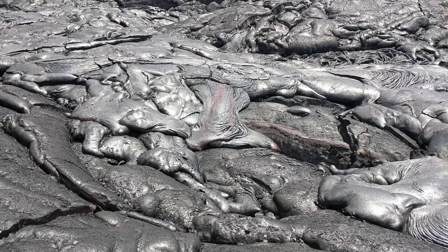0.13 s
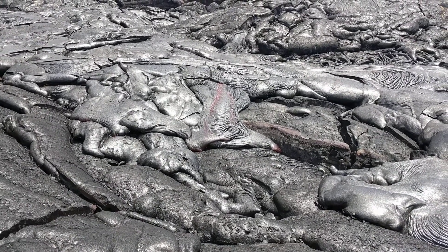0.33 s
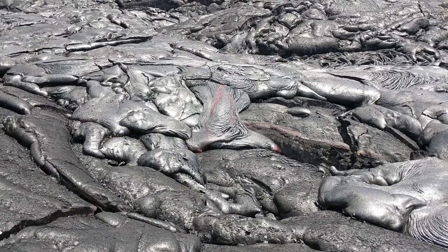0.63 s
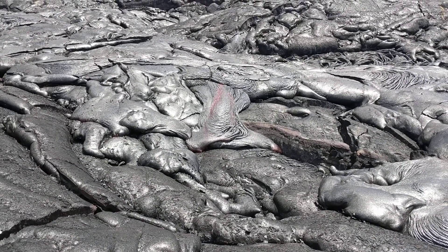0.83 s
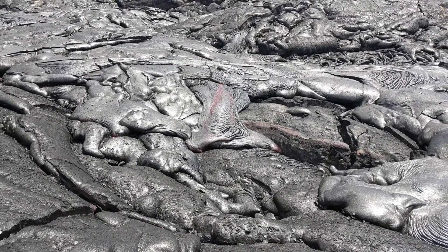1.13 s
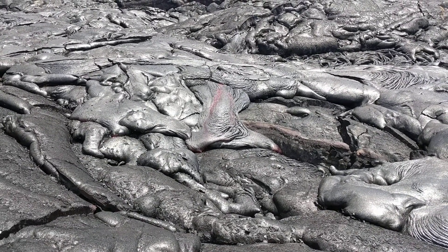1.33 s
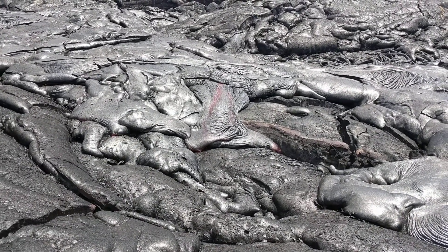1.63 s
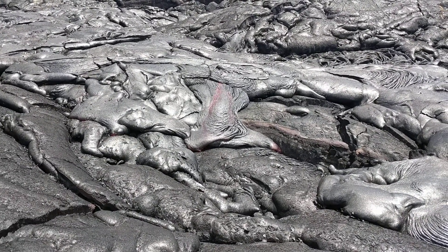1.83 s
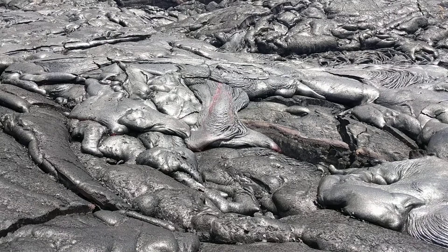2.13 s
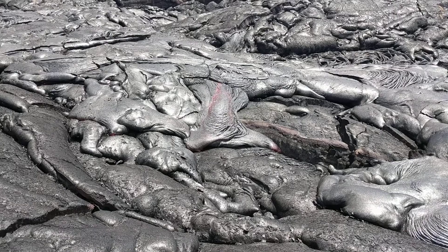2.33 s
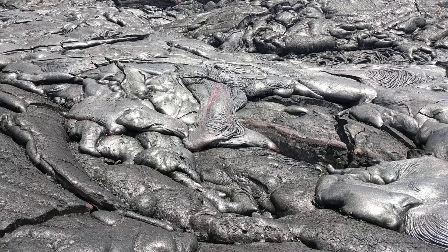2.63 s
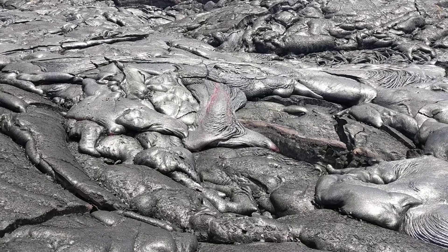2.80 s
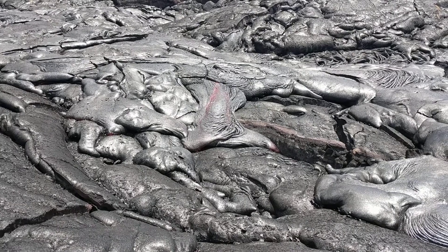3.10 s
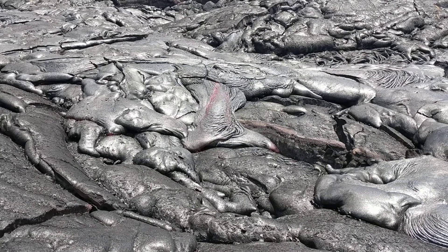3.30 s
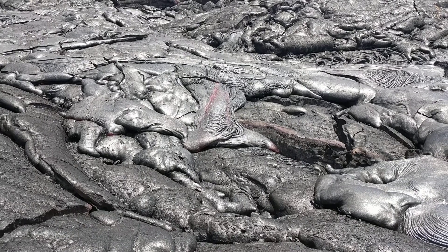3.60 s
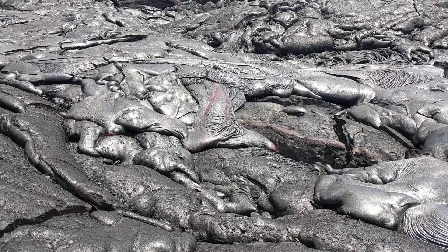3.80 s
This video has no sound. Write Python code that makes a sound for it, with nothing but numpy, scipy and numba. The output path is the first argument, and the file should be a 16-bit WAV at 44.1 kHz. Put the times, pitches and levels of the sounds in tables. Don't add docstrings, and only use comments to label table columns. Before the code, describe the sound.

Sparse sharp cracks over a fine patter of tiny ticks from shrinking lava crust, outdoors without echo. Low wind buffets hit the bare microphone early and again past the middle, above faint hiss.

```python
import sys
import numpy as np
from scipy import signal
from scipy.fft import rfft, irfft
from scipy.io import wavfile
from scipy.ndimage import uniform_filter1d
from numba import njit

SR = 44100
rng = np.random.default_rng(int(sys.argv[2]) if len(sys.argv) > 2 else 0)


def store_wav(level_fs):
    pcm = np.round(np.clip(np.atleast_2d(level_fs), -1, 1) * 32767)
    wavfile.write(sys.argv[1], SR, pcm.T.astype(np.int16))


def volts_from_decibels(level):
    exponent = np.asarray(level, float) / 20
    return 10 ** exponent


N = 174195


def level(x, db):
    return x * volts_from_decibels(db) / np.sqrt(np.mean(x ** 2))


@njit
def svf(x, hz, share):
    y, band, low = np.empty(len(x)), 0., 0.
    for i in range(len(x)):
        g = np.tan(np.pi * hz[i] / SR)
        v = (band + g * (x[i] - low)) / (1 + g * (g + share))
        band = 2 * v - band
        low = low + 2 * g * v
        y[i] = share * v
    return y


def resonate(x, hz, share):
    return svf(x, np.full(len(x), float(hz)), share)


def walk(rate):
    hold = int(SR / rate)
    steps = np.repeat(rng.standard_normal(N // hold + 1), hold)
    w = uniform_filter1d(uniform_filter1d(steps, hold), hold)[:N]
    return w / w.std()


def colour(x, table):
    hz, db = np.array(table).T
    f = np.fft.rfftfreq(len(x), 1 / SR) + 1
    return irfft(rfft(x) * volts_from_decibels(np.interp(np.log(f), np.log(hz), db)), len(x))


def add(out, at_s, x):
    i = max(int(at_s * SR), 0)
    out[i:i + len(x)] += x[:len(out) - i]


# frequency [Hz], relative level [dB].
FLOOR_TONE = [(150, -22), (340, 12), (1400, -3.5), (2600, -10), (7000, -16), (13000, -51), (15800, -30),
              (16200, -39)]


def hiss():
    whine_hz, whine_width_hz = 8920, 100
    whine = resonate(rng.standard_normal(N), whine_hz, whine_width_hz / whine_hz)
    air = level(colour(rng.standard_normal(N), FLOOR_TONE), -61)
    return air * volts_from_decibels(0.09 * walk(31.05)) + level(whine, -74)


def eddy(hz, share, air):
    steady_s, steadiness = .08, .4
    centre = hz * np.exp(0.053 * walk(11))
    x = svf(svf(air, centre, share), centre, share)
    x = svf(x, centre, 0.79 * share)
    power = uniform_filter1d(x ** 2, int(steady_s * SR)) + 1e-12
    return level(x / power ** steadiness, 0)


# time in seconds [s], rumble level [dB], share of fast eddies [dB].
GUST_FLOW = [(0, -24, -5), (.15, -26, -3.5), (0.331, -18.5, 0.5), (.43, -25.5, -1), (.59, -20, -1),
             (.76, -24, -2.5), (1.0, -24, -13), (1.07, -29.5, -1.5), (1.42, -24, -8.5), (1.56, -33.5, -7),
             (1.83, -32, -9.5), (2.15, -36, -7.5), (2.5, -31, -6), (2.64, -22.5, -5.5),
             (2.948, -23.5, -8.5), (3.05, -38.5, -17), (3.188, -26.5, -5.5), (3.95, -32.5, -9)]

# pitch [Hz], level [dB], how strongly it follows the fast share [dB per dB],
# flutter [dB].
EDDY_SIZES = [(58.77, -7, -0.8, 2.5), (86.66, -0.5, 0.48, 2), (131.5, -10, 0.81, 3), (263, -27.5, 1.53, 3),
              (422, -29.5, 1.1, 3.5), (800, -38.5, 0.71, 3.5)]


def wind():
    t = np.arange(N) / SR
    air = rng.standard_normal(N)
    s, rumble_db, fast_db = np.array(GUST_FLOW).T
    flow_db = np.interp(t, s, rumble_db) + 0.67 * walk(15)
    fast_db = np.interp(t, s, fast_db)
    out = np.zeros(N)
    for hz, own_db, follow, flutter_db in EDDY_SIZES:
        eddy_db = flow_db + own_db + follow * fast_db + flutter_db * walk(21.934)
        out += eddy(hz, .68, air) * volts_from_decibels(eddy_db)
    return out


# centre in seconds [s], swell level [dB], length [s],
# sharp rasp level [dB].
BUFFET_HITS = [(0.216, -25, 0.015, -61), (0.305, -23.5, 0.007, -36.5), (0.321, -31, 0.0099, -45.5),
               (0.353, -17, 0.0058, -30), (0.367, -17.5, 0.013, -33), (0.472, -26, 0.01, -52),
               (0.552, -30.5, 0.01, -57.5), (0.587, -27.5, 0.017, -50.5), (0.625, -33, 0.0092, -47),
               (0.645, -21.5, 0.004, -31), (1.239, -33, 0.009, -64), (1.52, -34, 0.005, -52),
               (2.622, -20, 0.0066, -33.5), (2.658, -33.5, 0.0064, -77), (2.738, -29, 0.0023, -46),
               (2.775, -37, 0.0072, -67), (2.86, -26, 0.021, -62), (2.897, -40, 0.0044, -72),
               (3.135, -46, 0.019, -67), (3.178, -38, 0.0033, -44), (3.213, -33.5, 0.0057, -60),
               (3.303, -35, 0.0083, -58.5), (3.903, -46.5, 0.12, -61)]


def buffets():
    rise = 0.44
    swell_hz, rasp_hz, swell_rough_db, rasp_rough_db = 185, 626, 4, 5
    t, swell, rasp = np.arange(N) / SR, np.zeros(N), np.zeros(N)
    for s, swell_db, length_s, rasp_db in BUFFET_HITS:
        age = (t - s) / max(length_s, .002)
        shape = np.exp(np.where(age < 0, age / rise, -age))
        swell += shape * volts_from_decibels(swell_db)
        rasp += shape * volts_from_decibels(rasp_db)
    air = rng.standard_normal(N)
    swell = swell * volts_from_decibels(swell_rough_db * walk(100)) * eddy(swell_hz, 1.287, air)
    rasp = rasp * volts_from_decibels(rasp_rough_db * walk(250)) * eddy(rasp_hz, 0.82, air)
    return swell + rasp


# time in seconds [s], signed pressure [full scale],
# half width [s].
VORTICES = [(0.137, -0.15, 0.0015), (0.293, -0.15, 0.0034), (0.355, 0.051, 0.00075), (.479, -0.28, 0.0017),
            (0.54, 0.083, 0.0045), (0.602, 0.031, 0.0034), (.630, -.12, 0.0017), (0.6478, 0.14, 0.00092),
            (1.236, .1, 0.0017), (1.519, 0.026, 0.0048), (1.5222, -0.098, 0.0014), (2.6225, -0.26, 0.0007),
            (2.646, -0.18, 0.0023), (2.7375, -0.27, 0.0011), (2.806, 0.11, 0.0011), (2.8573, 0.099, 0.0017),
            (3.126, -0.11, 0.0015), (3.1774, -0.19, 0.0014), (3.2108, -0.12, 0.0023),
            (3.3103, -0.049, 0.0026), (3.495, -0.073, 0.0018), (3.9071, -0.14, 0.0028)]


def thumps():
    t, push = np.arange(N) / SR, np.zeros(N)
    for s, pressure, half_s in VORTICES:
        push += pressure / np.cosh(np.clip(1.5 * (t - s) / half_s, -50, 50))
    return 0.52 * push + 1.94 * resonate(push, 100, 0.75)


def snap(noise, hz, share):
    snap_s, ring_s, ring_db, spiky_db, strike = 0.0005, 0.0035, -18, -2.5, 6.5
    t = np.arange(noise.shape[1]) / SR
    shape = np.exp(-t / snap_s) + volts_from_decibels(ring_db) * np.exp(-t / ring_s)
    burst = noise[0] * volts_from_decibels(spiky_db * noise[1]) * shape
    burst = burst + strike * (t == 0)
    hz = min(hz, .42 * SR)
    x = resonate(resonate(burst, hz, share), hz, share)
    return x / np.sqrt(np.sum(x ** 2) / (.003 * SR))


# time in seconds [s], level [dB].
TICK_PATTER = [(0, -54.5), (.35, -57.5), (.6, -54), (1.1, -55), (1.8, -57.5), (2.4, -55.5), (3.15, -60),
               (3.6, -48), (3.95, -56.5)]


def ticks():
    ticks_per_s, low_hz, octaves, dull_db_per_octave = 440, 1670, 3.41, 1.5
    spread_db, swarm_db, flicker_db = 2, 2, 4
    out, count = np.zeros(N), int(ticks_per_s * N / SR)
    busy_db = np.interp(np.arange(N) / SR, *np.array(TICK_PATTER).T) + swarm_db * walk(35)
    draws, noises = rng.random((count, 3)), rng.standard_normal((count, 2, 160))
    for (when, pitch, size), noise in zip(draws, noises):
        octave = octaves * pitch ** .5
        size_db = np.minimum(-spread_db * np.log(size), 9)
        dull_db = dull_db_per_octave * (octaves - octave)
        db = busy_db[int(when * N)] - 13.0 + size_db - dull_db
        add(out, when * N / SR, volts_from_decibels(db) * snap(noise, low_hz * 2 ** octave, .33))
    sizzle = level(resonate(rng.standard_normal(N), 14240, 0.81), -11)
    return out + sizzle * volts_from_decibels(busy_db + flicker_db * walk(220))


# time in seconds [s], body level [dB], bright edge level [dB], body pitch [Hz],
# low knock level [dB].
BIG_CRACKS = [(0.123, -45, -40.5, 5100, -61), (0.1745, -51, -58, 4250, -53.5),
              (0.2618, -57, -47, 4170, -79), (0.5752, -58, -43, 4700, -63), (0.5823, -61, -45, 5400, -67),
              (0.589, -69, -37.5, 5900, -58), (0.8379, -70, -46, 5600, -62),
              (0.8736, -36.5, -60, 4840, -59), (1.1045, -49, -44, 5030, -58.5),
              (1.197, -45, -39.5, 5960, -51.5), (1.3548, -48, -45, 5940, -65),
              (1.5357, -43.5, -57, 4330, -60), (1.668, -64, -46, 5700, -61),
              (2.1882, -44.5, -60, 4260, -46), (2.1888, -32.5, -70, 5260, -66),
              (2.3014, -50, -52, 4460, -58.5), (2.333, -44, -49, 7200, -73), (2.3541, -64, -49, 4500, -81),
              (2.4835, -40.5, -53, 3900, -68), (2.6205, -32.5, -31, 4440, -67),
              (2.8428, -51.5, -41.5, 5000, -75), (3.0595, -45.5, -42, 5740, -65),
              (3.2257, -43, -38, 6650, -57), (3.6006, -49, -49, 5500, -64),
              (3.6467, -79, -43.5, 3800, -53.5)]

# time in seconds [s], body level [dB], bright edge level [dB], body pitch [Hz].
SMALL_FLAKES = [(0.0, -56, -55, 3180), (0.0303, -60, -54, 6500), (0.1278, -58, -51, 4900),
                (0.1814, -60, -70, 3700), (0.2779, -58, -48.5, 4730), (0.335, -56.5, -57, 5100),
                (0.3678, -59, -66, 1900), (0.444, -83, -54.5, 6900), (0.497, -61, -74, 5200),
                (0.5428, -57, -51, 5700), (0.6088, -59, -49, 5800), (0.6433, -58, -49, 4300),
                (0.664, -53.5, -57, 5870), (0.7251, -69, -58, 5500), (0.846, -58, -59, 5870),
                (0.878, -58, -51, 5300), (0.9566, -58, -48, 6100), (0.9783, -57, -50, 5570),
                (1.037, -64, -54, 4180), (1.0828, -68, -49, 7300), (1.1613, -60, -53, 7260),
                (1.2133, -58, -46, 7500), (1.2685, -55, -50, 7300), (1.279, -62, -54, 5450),
                (1.296, -56, -75, 5300), (1.3744, -56, -54, 5300), (1.3817, -65, -52, 5300),
                (1.4086, -57.5, -56, 7200), (1.5422, -73, -45, 6500), (1.5483, -67, -49, 7300),
                (1.5533, -55, -51, 4400), (1.562, -72, -58, 3600), (1.6333, -61, -60, 6400),
                (1.7437, -61, -58, 6300), (1.7632, -62.5, -70, 3200), (1.882, -55, -50, 5900),
                (1.9068, -57.5, -58, 5370), (1.9576, -61.5, -69, 5100), (1.9654, -59.5, -70, 2720),
                (2.0157, -64, -59, 5400), (2.039, -61, -55, 7400), (2.2147, -50.5, -49, 2320),
                (2.2666, -52.5, -49, 6240), (2.3284, -62, -57, 6600),
                (2.3678, -64, -54, 6300), (2.3815, -60.5, -93, 2700), (2.4999, -60, -51, 3600),
               (2.5195, -58, -53, 6100), (2.5595, -62, -60, 7040), (2.6247, -59, -58, 4400),
               (2.6499, -60, -59, 5200), (2.692, -61, -49.5, 6170), (2.7028, -68, -50, 6800),
               (2.7154, -52, -47.5, 6750), (2.7379, -57, -61, 2000), (2.7427, -57, -53, 4700),
               (2.7808, -63, -58, 5700), (2.787, -60, -60, 3900), (2.8333, -64, -47, 5700),
               (2.8528, -71, -50, 6600), (2.8702, -72, -47.5, 5600), (2.9293, -80, -46.5, 7500),
               (3.0411, -67, -60, 4600), (3.0831, -79, -57, 5500), (3.1365, -66, -68, 2800),
               (3.1524, -63, -60, 5070), (3.1744, -59, -52, 4640), (3.1855, -57, -93, 2630),
               (3.2077, -55, -51, 6700), (3.2464, -60, -51, 4000), (3.3089, -56.5, -60, 6200),
               (3.3144, -60, -59, 5900), (3.3542, -63, -58, 3400), (3.4357, -63, -56, 4560),
               (3.458, -58, -59, 5700), (3.4663, -60, -51, 3580), (3.495, -59, -46, 4700),
               (3.507, -63, -57, 3750), (3.6537, -57, -49, 5940), (3.658, -58, -62, 4500),
               (3.6775, -55.5, -48, 5400), (3.7279, -53.5, -46, 7060), (3.7331, -60, -56, 3400),
               (3.7682, -60.5, -58, 4930), (3.8844, -55.5, -53, 7300), (3.8906, -63, -63, 3380),
               (3.924, -56, -48.5, 6900), (3.9348, -53.5, -56, 5430)]


def cracks():
    body_share, knock_hz, edge_hz, edge_width_hz = 0.81, 1580, 13500, 12500
    out, rows = np.zeros(N), list(BIG_CRACKS)
    for s, body_db, edge_db, hz in SMALL_FLAKES:
        rows.append((s, body_db, edge_db, hz, body_db - 6))
    noises = rng.standard_normal((len(rows), 2, 440))
    for (s, body_db, edge_db, hz, knock_db), noise in zip(rows, noises):
        body = volts_from_decibels(body_db) * snap(noise, hz, body_share)
        knock = volts_from_decibels(knock_db) * snap(noise, knock_hz, 0.65)
        edge = volts_from_decibels(edge_db) * snap(noise, edge_hz, edge_width_hz / edge_hz)
        add(out, s - .0001, knock + edge - body)
    return out


def scene():
    hits = thumps()
    calm = 1 / (1 + 12 * uniform_filter1d(np.abs(hits), 600))
    return (hiss() + wind() * calm + buffets() + hits + ticks() + cracks())[None]


def band_limit(x):
    return signal.sosfilt(signal.butter(12, 16900, fs=SR, output="sos"), x)


def record(dry):
    mic_cut_hz, top_hz, above_top_db = 35, 15900, -38
    bass_cut = signal.butter(3, mic_cut_hz, "high", fs=SR, output="sos")
    x = np.tanh(1.628 * signal.sosfiltfilt(bass_cut, dry)) / 1.456
    top_cut = signal.ellip(8, .1, 40, top_hz, fs=SR, output="sos")
    low = signal.sosfiltfilt(top_cut, x)
    return band_limit(low + volts_from_decibels(above_top_db) * (x - low))


dry = scene()
out = record(dry)
store_wav(out)
```